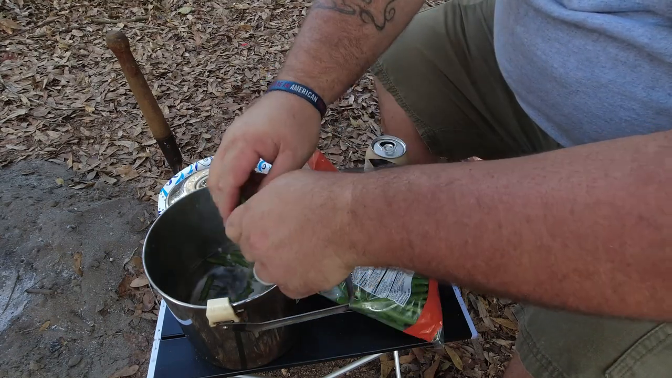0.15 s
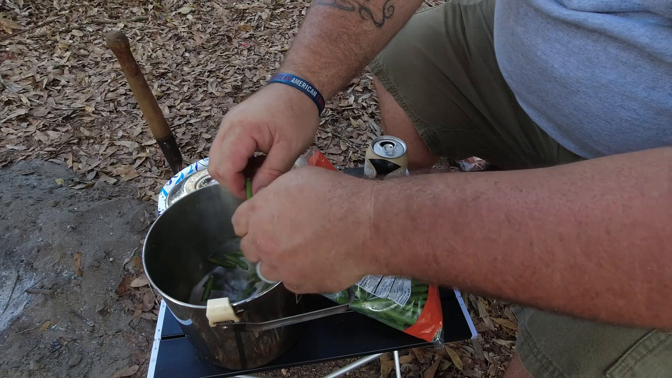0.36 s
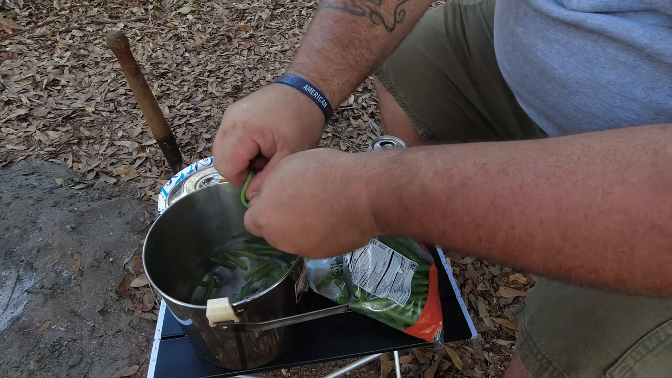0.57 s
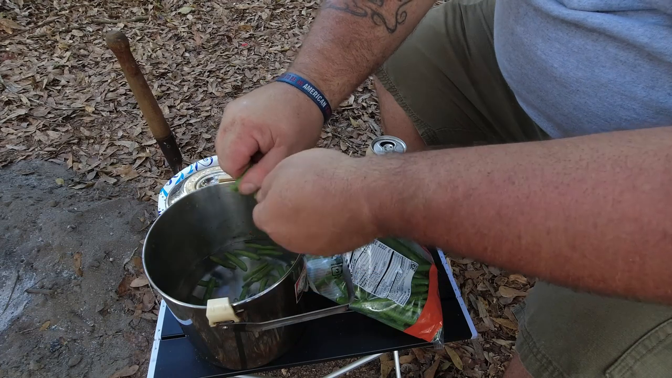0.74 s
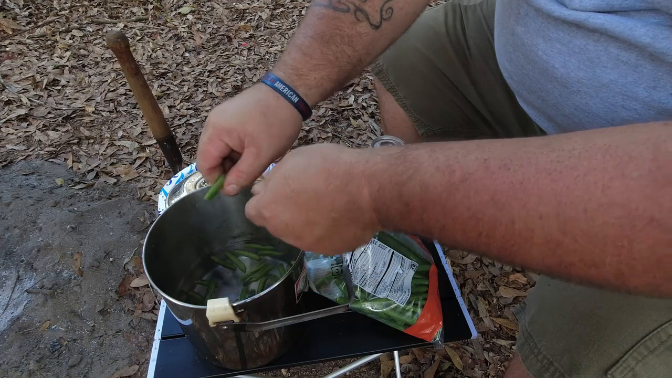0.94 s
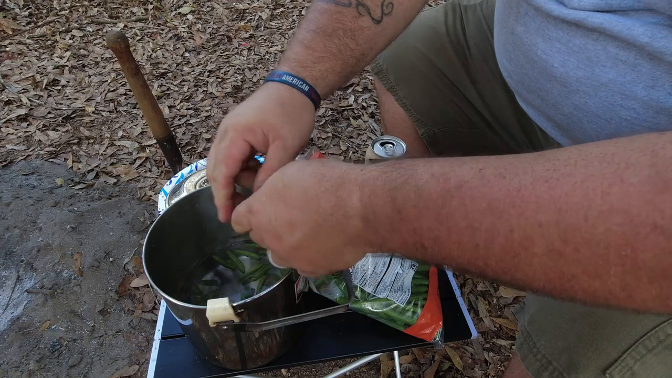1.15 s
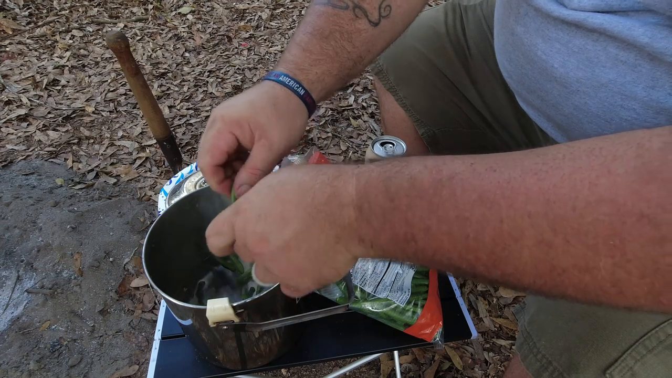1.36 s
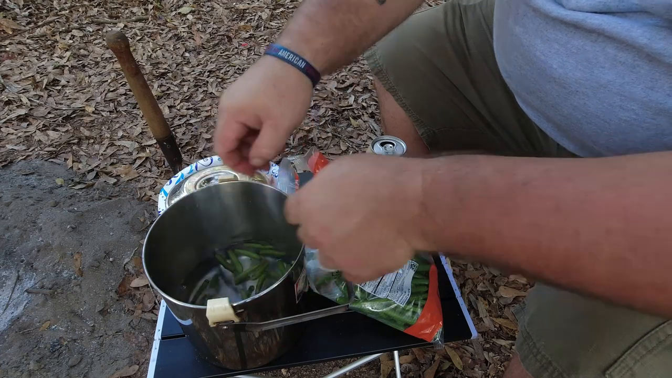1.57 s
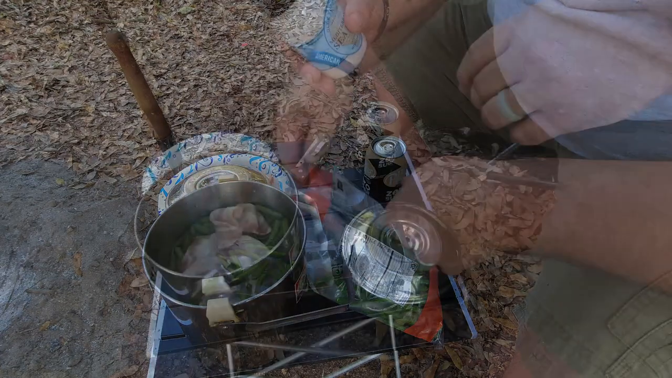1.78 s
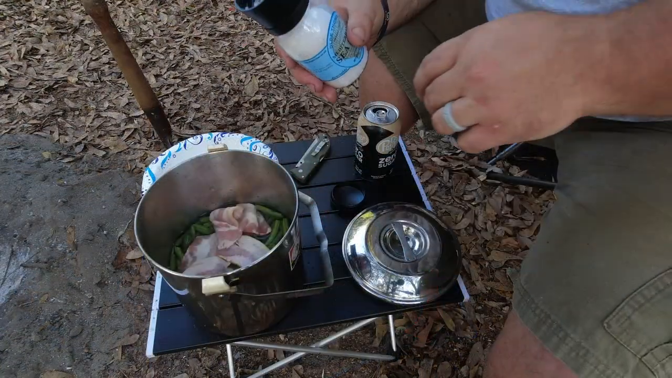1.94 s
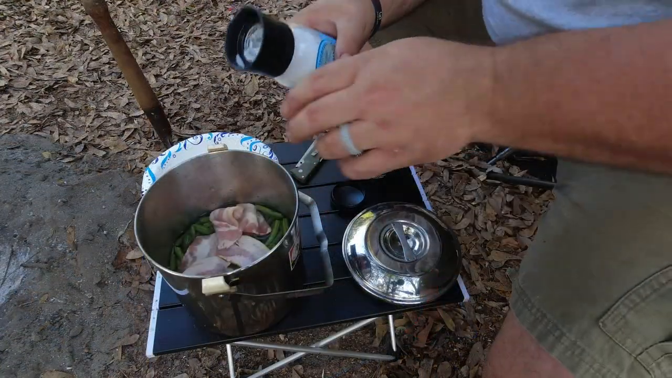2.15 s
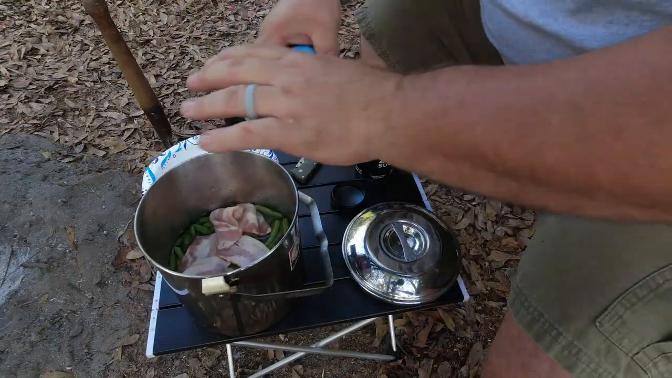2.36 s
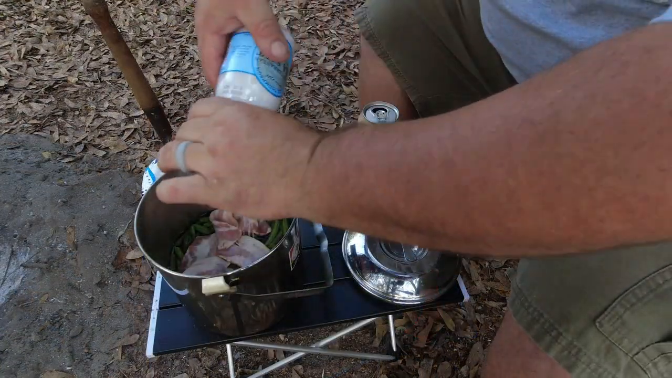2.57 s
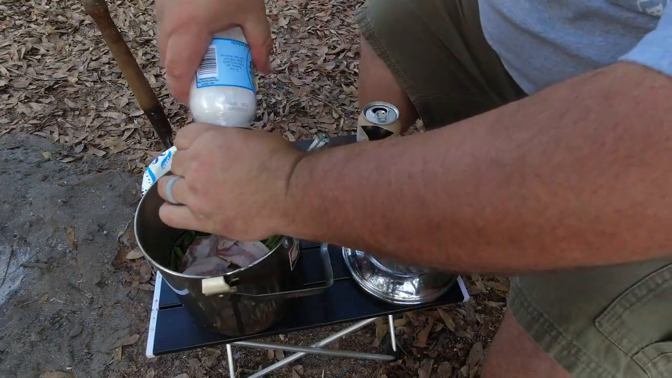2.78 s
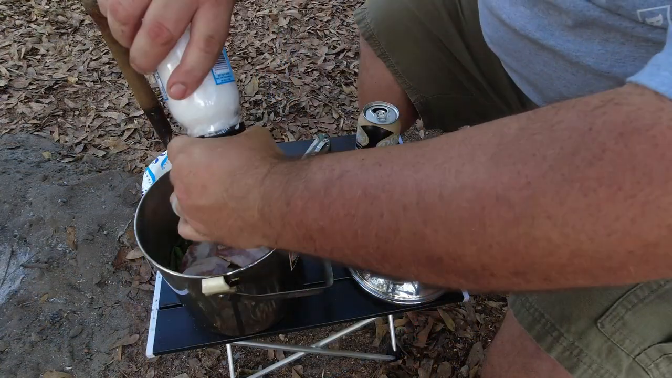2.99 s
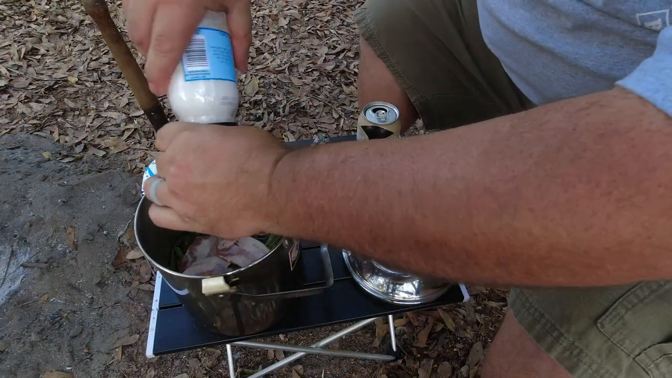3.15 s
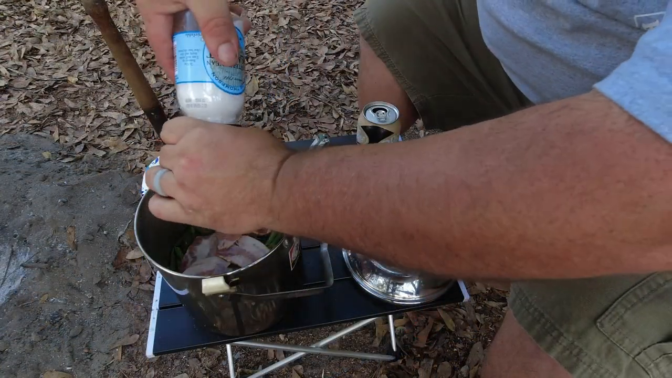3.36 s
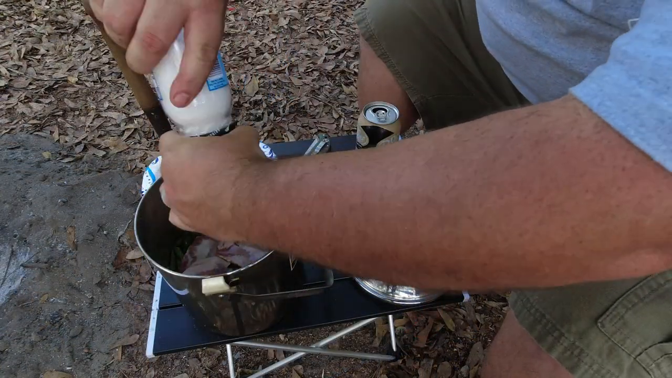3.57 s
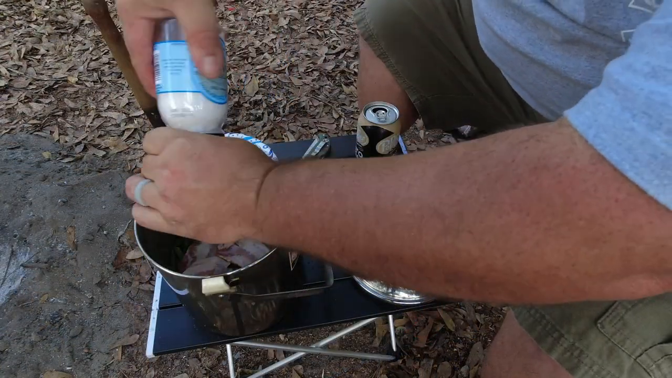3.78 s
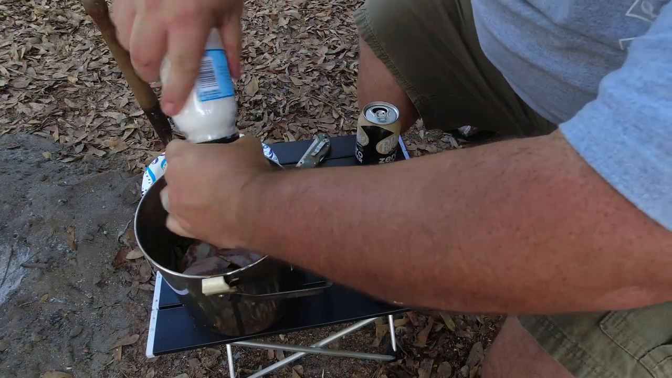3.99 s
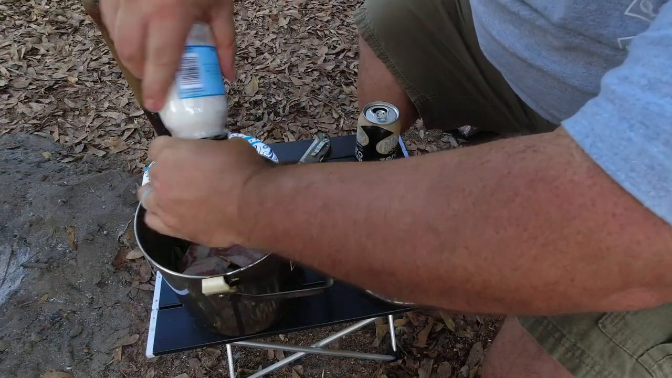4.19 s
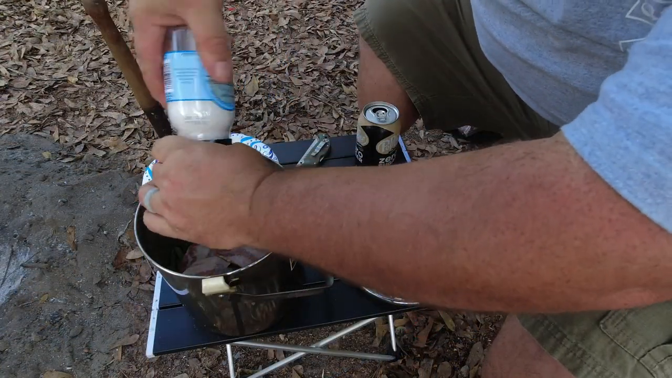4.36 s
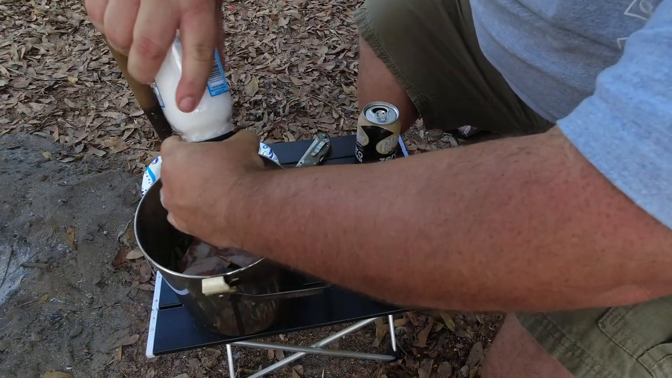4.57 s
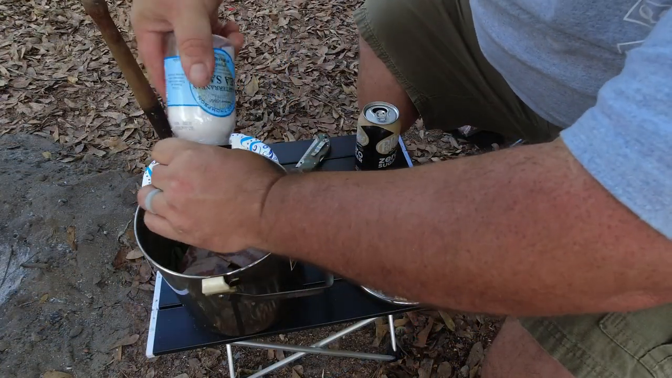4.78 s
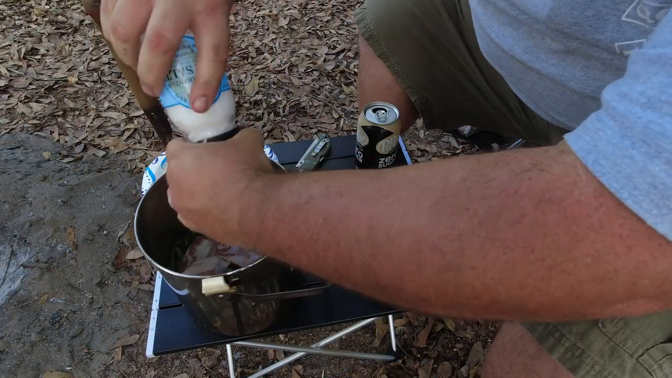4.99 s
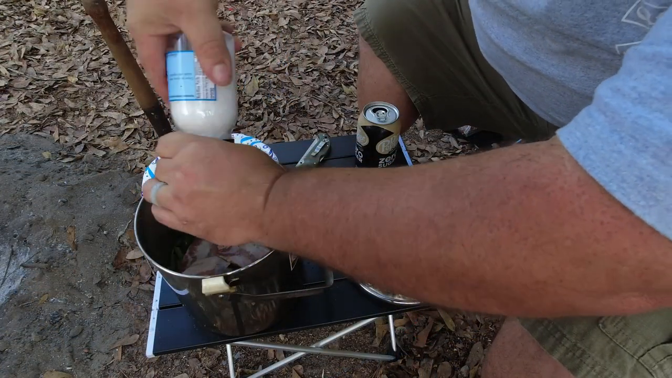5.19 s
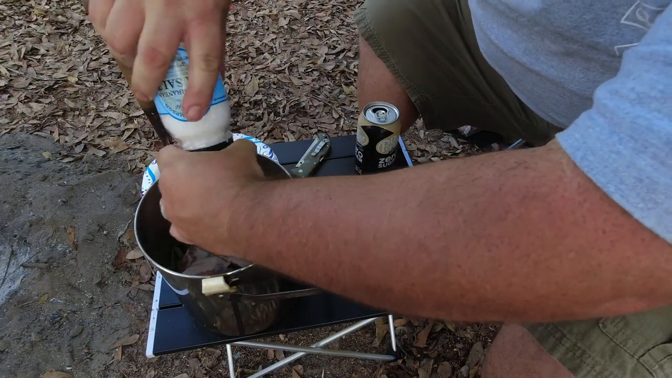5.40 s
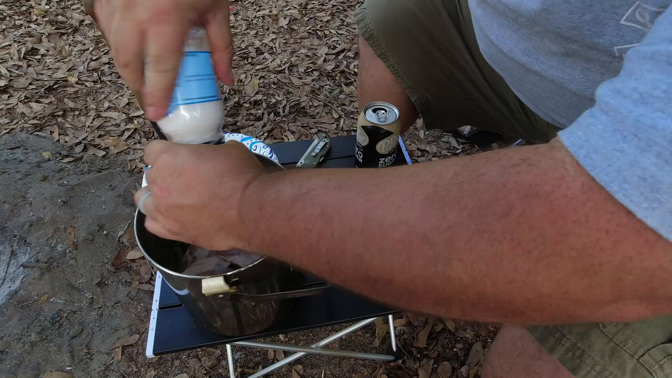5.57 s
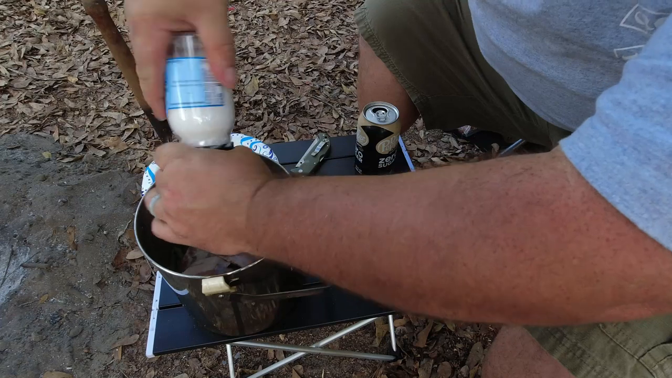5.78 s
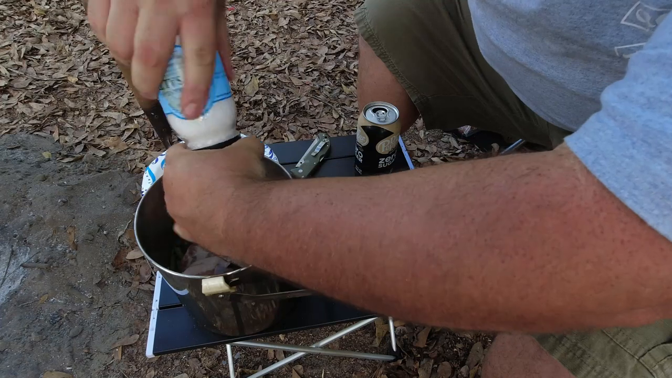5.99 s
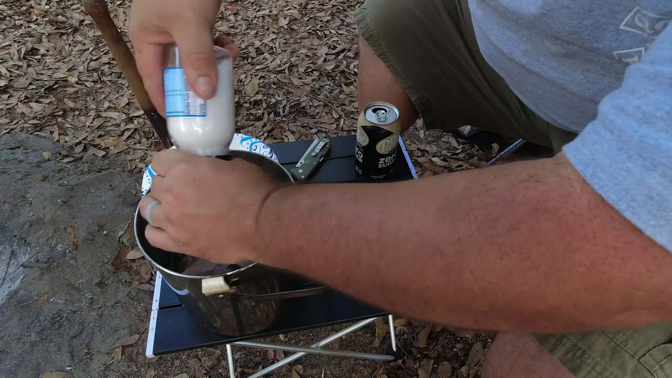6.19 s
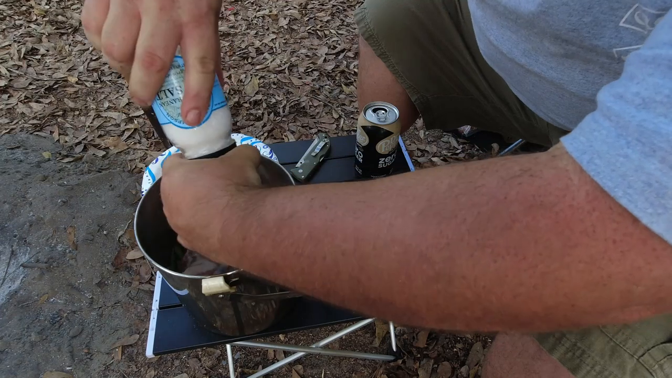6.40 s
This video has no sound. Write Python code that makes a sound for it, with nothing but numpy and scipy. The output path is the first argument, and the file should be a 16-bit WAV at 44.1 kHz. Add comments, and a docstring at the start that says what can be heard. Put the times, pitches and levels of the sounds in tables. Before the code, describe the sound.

Outdoors, close and dry, over a faint low rumble, bean pieces tap into a steel pot with short dull rings. A green bean snaps crisply, more bits drop, then a plastic bag crinkles briefly. Salt hisses down a tipped bottle, and a hand grinder crunches in hard, short twists alternating with lighter scraping turns until the end.

```python
"""Over a low rumble of air, bean pieces drop into a steel pot (noise thuds exciting decaying modes, one with a sharp
click), then a green bean is snapped (a click and a burst of small breaks). A plastic bag crinkles: dense breaks
with louder creases. Then salt slides down a tipped grinder's bottle (filtered grains) and the grinder is twisted
to and fro: hard forward turns crush the crystals, light back turns scrape and tick, and big crystals crack singly."""
import sys
import numpy as np
from scipy import signal
from scipy.fft import rfft, irfft
from scipy.io import wavfile
from scipy.ndimage import uniform_filter1d

SR = 44100
rng = np.random.default_rng(int(sys.argv[2]) if len(sys.argv) > 2 else 0)


def unload_audio(sound):
    """Save the sound as a 16-bit wav file, at the path given as the first command line argument."""
    columns = np.transpose(np.atleast_2d(sound))
    # keep every value between -1 and 1, then stretch to whole-number steps
    steps = np.round(np.clip(columns, -1, 1) * 32767)
    wavfile.write(sys.argv[1], SR, steps.astype(np.int16))


N = 284004
TIME = np.arange(N) / SR  # s

# Twists of the grinder. Each row: start in seconds, length in seconds, mid-turn level of the coarse grains in dB,
# the same for the fine grains in dB, seconds of light catching before the burrs bite.
FORWARD_TURNS = [(3.145, 0.19, -31.5, -38, .008), (3.75, 0.1, -30, -36.5, 0.024),
                 (4.224, 0.1, -30, -35.5, 0.03), (4.666, 0.1, -29.5, -37, 0.015),
                 (5.135, 0.13, -32, -37, 0.0087), (5.624, 0.082, -29.5, -33, 0.022),
                 (6.064, 0.12, -31, -38.5, .01)]
BACK_TURNS = [(2.775, 0.18, -43.5, -63, .004), (3.474, 0.12, -42.5, -57.5, 0.0087),
              (3.972, 0.12, -43, -49, 0.011), (4.418, 0.13, -45, -54, 0.011),
              (5.367, 0.092, -44, -47.5, .003), (5.825, 0.11, -47.5, -49, 0.029),
              (6.3, 0.095, -46, -47, 0.035)]
# Spectrum of the grinder's body. Each row: frequency in Hz, relative level in dB.
GRINDER_COLOUR = [(88, -107), (150, -32), (398, -10), (589, -16.5), (837, -17.5), (1120, -4.5),
                  (1240, -6.5), (1630, -3), (2450, -2.5), (3920, -4), (5150, -8), (6260, -10), (7320, -17),
                  (13200, -19), (16000, -41)]
# Resonances and dips of the grinder's head. Each row: centre in Hz, width in Hz, height in dB.
GRINDER_HEAD = [(240, 20, 3), (587, 45, 7), (730, 760, 1), (1112, 150, 4), (3940, 970, 2.5),
                (5116, 700, -8), (6470, 190, 6), (12470, 3360, -10)]
# Sag of the coarse grains' level at both ends of a twist, which is hardest in its middle.
COARSE_ARCH_DB = 4


def grinder():
    """Brittle fracture under shear: burrs crush the crystals while big ones crack singly."""
    # Big crystals cracking. Each row: time in seconds, peak in dB before the common cut below,
    # pitch in Hz, treble lift in dB.
    big_crystals = [(2.776, -14, 1740, -13), (2.85, -23, 2390, -17), (2.889, -14.5, 2730, -15),
                    (2.9, -10, 1640, -5), (2.914, -16, 1950, -21), (2.931, -13, 1440, -12),
                    (3.13, -16.5, 2670, 15), (3.14, -13.5, 2030, -8), (3.156, -14.5, 2400, -9),
                    (3.163, -14.5, 1920, -22), (3.171, -14.5, 2500, -13), (3.227, -13, 2970, 5),
                    (3.282, -20, 2530, -9), (3.31, -16.5, 3770, 2), (3.531, -15.5, 3470, 9),
                    (3.595, -15.5, 3950, 20), (3.723, -24, 2400, 15), (3.741, -9, 2460, -1),
                    (3.837, -13, 1730, -6), (3.974, -17.5, 3940, 19), (3.993, -14, 1390, -7.5),
                    (4.036, -16, 1550, -8), (4.265, -13, 1650, -6), (4.338, -25, 2600, -1),
                    (4.419, -21, 1590, -4), (4.429, -23, 3850, 18), (4.467, -12, 2650, 7),
                    (4.492, -12.5, 3530, -2), (4.537, -21.5, 1900, 25), (4.555, -22.5, 2580, 17),
                    (4.659, -17, 2480, -10), (4.692, -13.5, 2200, -5), (4.714, -11.5, 2200, -5),
                    (4.752, -23, 2290, 0), (4.771, -15, 2040, 2), (4.885, -37, 2404, -12),
                    (5.136, -12.5, 2370, 5), (5.257, -15, 1390, -9), (5.276, -23, 1599, -15),
                    (5.367, -21.5, 4200, 19), (5.393, -22, 4330, 8), (5.468, -23, 2550, 3),
                    (5.609, -20, 1500, -17), (5.627, -14, 1085, -5), (5.831, -18, 3850, 6),
                    (5.9, -15, 2830, 2), (6.175, -17, 1623, -14), (6.27, -27.5, 3600, 27),
                    (6.326, -17, 2550, -10), (6.366, -15.5, 3000, 6.5), (6.371, -20, 2700, 2)]
    forward = crushing(FORWARD_TURNS, per_s=2600, spread_db=5.5, catch_db=-14.5)
    forward += small_cracks(FORWARD_TURNS, over_db=8)
    back = crushing(BACK_TURNS, per_s=5000, spread_db=5.5, catch_db=-8.5)
    back += small_cracks(BACK_TURNS, over_db=15)
    cracks = sum(crack(*row) for row in big_crystals)
    return scattered(forward + back + from_db(-2.5) * cracks, t60=0.021, wet_db=-13)


def crushing(turns, per_s, spread_db, catch_db):
    """Granular friction in two bands: coarse grains crunch low, fine ones fizz high, after a light catch."""
    split_hz, fine_arch_db = 3000, 4.5
    breaks = crackle(GRINDER_COLOUR, GRINDER_HEAD, per_s, spread_db, lift_db=12.5)
    low_pass = signal.butter(3, split_hz, "low", fs=SR, output="sos")
    high_pass = signal.butter(3, split_hz, "high", fs=SR, output="sos")
    coarse = rms_one(signal.sosfilt(low_pass, breaks))
    fine = rms_one(signal.sosfilt(high_pass, breaks))
    crunch = coarse * uneven() * twisting(turns, COARSE_ARCH_DB, axis=2)
    fizz = fine * uneven() * twisting(turns, fine_arch_db, axis=3)
    # the catch is set relative to the coarse level of its turn
    catch = sum(from_db(db + catch_db) * stroke(s - lead, lead, 0, 3300, 2300) for s, _, db, _, lead in turns)
    return crunch + fizz + breaks * catch


def small_cracks(turns, over_db, pitch_hz=2300, treble_db=-6):
    """Random fracture: lesser crystals break at uneven intervals, each with its own size and hardness."""
    cracks_per_s, spread_db = 30, 2.5
    out = np.zeros(N)
    for start, length, coarse_db, *_ in turns:
        places = rng.random(16)
        chances = rng.standard_normal((16, 3)).clip(-1.5, 1.5)
        for k, (place, (loud, high, hard)) in enumerate(zip(places, chances)):
            delay = (k + place) / cracks_per_s  # one crack per equal slot, anywhere within it
            if delay < length:
                peak_db = coarse_db + over_db + spread_db * loud
                out += crack(start + delay, peak_db, pitch_hz * 2 ** (.5 * high), treble_db + 5 * hard)
    return out


def crack(s, db, hz, treble_db):
    """Impulsive excitation of a resonant body: crystal size sets the pitch, hardness the treble."""
    hardness = (12100, 18000, treble_db)  # centre Hz, width Hz, lift dB
    response = tinted(GRINDER_COLOUR, [*GRINDER_HEAD, hardness], hz, lift_db=7)
    return fracture(s, db, response, run_s=.0009, click_db=-0.5)


def twisting(turns, arch_db, axis):
    """Amplitude modulation by a series of twists, scaled by one of their level columns."""
    rise_db_per_s, fall_db_per_s = 1400, 730
    return sum(from_db(row[axis]) * stroke(row[0], row[1], arch_db, rise_db_per_s, fall_db_per_s) for row in turns)


def uneven():
    """Random amplitude modulation: the salt feeds the burrs unevenly."""
    depth_db, centre_hz = 1.68, 34.4
    wander = rms_one(band(rng.standard_normal(N), centre_hz / 2, centre_hz * 2))
    return from_db(depth_db * np.clip(wander, -2, 2))


def loose_salt(settle_s=0.037):
    """Granular flow: salt hisses down the tipped bottle, and trickles on for a moment after each turn."""
    # Slides down the bottle. Each row: start in seconds, length in seconds, mid-slide level in dB.
    slides = [(2.488, 0.48, -48), (4.89, 0.096, -59.5), (5.035, 0.068, -51.5)]
    # Spectrum of the sliding salt. Each row: frequency in Hz, relative level in dB.
    slide_colour = [(710, -36), (1200, -14.5), (1810, -12), (2090, -14), (2300, -11.5), (3470, 0.5),
                    (5300, -9), (6030, -6), (8630, -6), (13900, -19.5), (16000, -32.5)]
    stirred = from_db(-21.5) * twisting(FORWARD_TURNS, COARSE_ARCH_DB, axis=2)
    stirred += from_db(-7) * twisting(BACK_TURNS, COARSE_ARCH_DB, axis=2)
    keep = np.exp(-1 / (settle_s * SR))
    trickle = signal.lfilter([1 - keep], [1, -keep], stirred)  # one-pole lag
    sliding = sum(from_db(db) * stroke(s, length, arch_db=7.5, rise_db_per_s=220, fall_db_per_s=126)
                  for s, length, db in slides)
    hiss = rms_one(through(grains(per_s=9000, spread_db=7), body(slide_colour)))
    return (sliding + trickle) * hiss


def bean_clicks():
    """Impulsive contact, then brittle fracture: a bean strikes the pot and another snaps; the pot answers faintly."""
    # Sharp clicks: a bean striking the pot at 0.16 s, then a bean snapping at 0.7528 s.
    # Each row: time in seconds, peak in dB, starting level of the pot's answer in dB.
    clicks = [(0.16, -35, -70), (0.7528, -14, -54.5)]
    # Spectrum of both clicks. Each row: frequency in Hz, relative level in dB.
    click_colour = [(300, -26), (1000, -14), (1500, -12), (2150, 0), (3400, -3), (4550, -2), (5000, -11),
                    (6300, -6), (8300, -8), (11000, -5), (16000, -20)]
    out = np.zeros(N)
    for s, db, ring_db in clicks:
        out += fracture(s, db, body(click_colour), run_s=.0009, click_db=-1)
        answer = from_db(ring_db - 60 * TIME / 0.19) * np.sin(2 * np.pi * 2196 * TIME)  # t60 0.19 s
        add(out, s, answer)
    return scattered(out, t60=.09, wet_db=-24)


def bean_drops(thud_t60=0.022, thump_t60=0.1, ring_db=-11, size=13000):
    """Modal excitation: a short thud over a low thump; pot modes nearest the contact's pitch ring most."""
    # Landings in the pot. Each row: time in seconds, peak of the thud in dB, centre of the contact's sound in Hz.
    drops = [(0.104, -47, 348), (0.1166, -50, 2840), (0.156, -30.5, 1670), (0.160, -25, 3600),
             (0.165, -32.5, 6260), (0.836, -49.5, 2960), (1.169, -47.5, 450), (1.169, -55, 3360),
             (1.193, -46.5, 1170), (1.223, -44.5, 1280), (1.237, -56, 2500), (1.616, -42.5, 467),
             (1.624, -44.5, 280), (1.656, -30.5, 1270)]
    # Modes of the loaded pot. Each row: frequency in Hz, relative level in dB, t60 in seconds.
    pot_modes = [(240, -6, .11), (297, -6, .11), (450, -4, .13), (555, -6, .11), (1210, 2, .14),
                 (1701, -10, .13), (2196, -10, .14), (2686, -3, .08), (3693, -4, .13), (5523, -17, .09),
                 (6395, -7, .11), (6831, -12, .15)]
    thump_hz, thump_db = 340, -21.5  # the pot's floor, relative to the thud
    out, t = np.zeros(N), np.arange(size) / SR
    for s, db, hz in drops:
        contact = rng.standard_normal(size) * from_db(-60 * t / thud_t60)
        thud = band(contact, hz / 1.2, hz * 1.2) + from_db(-13) * band(contact, hz / 3, hz * 1.8)
        floor_push = rng.standard_normal(size) * from_db(-60 * t / thump_t60)
        thump = band(floor_push, thump_hz / 1.4, thump_hz * 1.26)
        ring = np.zeros(size)
        for mode_hz, mode_db, t60 in pot_modes:
            nearness = 1 / (1 + 2 * np.log2(mode_hz / hz) ** 2)
            ring += nearness * from_db(mode_db - 60 * t / t60) * np.sin(2 * np.pi * mode_hz * t)
        landing = thud / np.abs(thud).max()
        landing += from_db(thump_db) * thump / np.abs(thump).max()
        landing += from_db(ring_db) * ring
        add(out, s, from_db(db) * landing)
    return scattered(out, t60=0.075, wet_db=-13.5)


def bag():
    """Buckling film: fine crinkling swells as the hand closes, and louder creases pop."""
    # Grabs of the bag. Each row: start in seconds, length in seconds, level in dB reached at the end.
    grabs = [(1.778, .11, -36.5), (1.921, 0.052, -42)]
    # Creases popping. Each row: time in seconds, peak in dB.
    creases = [(1.754, -31), (1.775, -23.5), (1.785, -29), (1.813, -29.5), (1.874, -19.5), (1.881, -18.5),
               (1.925, -23.5), (1.936, -28), (1.9533, -16.5), (1.961, -22), (1.975, -28.5)]
    # Spectrum of the plastic. Each row: frequency in Hz, relative level in dB.
    bag_colour = [(110, -38), (180, -8), (225, -2), (404, -8.5), (515, -0.5), (645, -12.5), (839, -2),
                  (1620, -4), (1990, 3.5), (2400, -5), (3300, 1.5), (5090, -13), (9460, -22), (16000, -48)]
    swell_db_per_s = 99
    grip = np.zeros(N)
    for s, length, db in grabs:
        time_left = np.clip(s + length - TIME, 0, length)
        grab = stroke(s, length, arch_db=0, rise_db_per_s=398, fall_db_per_s=1500)
        grip += from_db(db - swell_db_per_s * time_left) * grab
    rustle = crackle(bag_colour, [], per_s=5000, spread_db=11.5, lift_db=5.5) * grip
    crease = tinted(bag_colour, [], hz=11200, lift_db=4.5)
    return rustle + sum(fracture(s, db, crease, run_s=0.0016, click_db=-6.5) for s, db in creases)


def air():
    """Filtered noise: a faint outdoor hush and hum, soft buffeting and, at first, a deep drone."""
    # Spectrum of the hush. Each row: frequency in Hz, relative level in dB.
    air_colour = [(35, -44), (60, -1.5), (79, -12), (124, -28), (301, -22.5), (607, -27), (785, -26),
                  (1200, -29.5), (5460, -39.5), (6580, -37), (12400, -58), (16000, -104)]
    # Faint far-off hum. Each row: time in seconds, level in dB.
    hum_levels = [(0, -62.5), (1.35, -69.5), (1.9, -59), (3.2, -64.5), (4.3, -68.5), (5.1, -75.5),
                  (6.44, -72)]
    # Slow breeze. Each row: time in seconds, level in dB.
    breeze = [(0, -50), (1.9, -60.5), (2.1, -77), (3.0, -68), (3.5, -51.5), (4.8, -53.5), (5.9, -45),
              (6.44, -51)]
    # Gusts on the microphone, added to the breeze. Each row: time of the peak in seconds, peak level in dB.
    gusts = [(0.03, -36.5), (1.05, -36.5), (1.87, -42)]
    gust_db_per_s = 79  # swelling and dying alike
    drone_hz, drone_db, drone_end_s = 37.8, -50.5, 1.8
    hush = from_db(-62.5) * rms_one(through(rng.standard_normal(N), body(air_colour)))
    hum = gain_curve(hum_levels) * rms_one(band(rng.standard_normal(N), 63.0, 147.5))
    wind = gain_curve(breeze) + sum(from_db(db - gust_db_per_s * np.abs(TIME - s)) for s, db in gusts)
    buffet = wind * rms_one(band(band(rng.standard_normal(N), 10, 22), 10, 30))
    narrow_noise = band(rng.standard_normal(N), drone_hz - 3, drone_hz + 3)
    drone = evened(narrow_noise, span_s=.12) * gain_curve([(0, drone_db), (drone_end_s, drone_db)])
    return hush + hum + buffet + drone


def fracture(s, db, response, run_s, click_db, size=2048):
    """Impulsive excitation: a click among smaller breaks that swell and die within milliseconds."""
    age, chance = np.arange(size) / SR / run_s, rng.standard_normal(size)  # age in units of run_s
    force = chance * np.abs(chance) * age * np.exp(-age)
    force /= np.linalg.norm(force)
    force[int(run_s * SR / 2)] += from_db(click_db)
    out, sound = np.zeros(N), through(force, response)
    add(out, s, from_db(db) * sound / np.abs(sound).max())
    return out


def crackle(colour, resonances, per_s, spread_db, lift_db, count=7):
    """Superposed shot noise: dense breaks of several sizes, each with its pitch, through a body; rms near 1."""
    breaks = np.zeros(N)
    for hz in np.geomspace(900, 11000, count):
        pitched = tinted([(1, 0)], [], hz, lift_db)  # flat apart from the lift
        breaks += through(grains(per_s / count, spread_db), pitched) * np.sqrt(hz)
    return evened(through(breaks, body(colour, resonances)), span_s=0.019)


def grains(per_s, spread_db):
    """Shot noise: random clicks of uneven size and either sign."""
    sizes = from_db(spread_db * np.clip(rng.standard_normal(N), -2, 2)) * rng.choice([-1, 1], N)
    return sizes * (rng.random(N) < per_s / SR)


def stroke(start, length, arch_db, rise_db_per_s, fall_db_per_s):
    """Exponential onset and decay of one hand movement, with a parabolic arch in dB between them."""
    along = np.clip((TIME - start) / length, 0, 1)
    before, after = np.maximum(start - TIME, 0), np.maximum(TIME - start - length, 0)
    outside = rise_db_per_s * before + fall_db_per_s * after
    return from_db(-np.minimum(arch_db * (2 * along - 1) ** 2 + outside, 200))


def tinted(colour, resonances, hz, lift_db):
    """Size-dependent resonance: a body's response favouring one pitch, higher for small pieces."""
    return body(colour, [*resonances, (hz, 0.59 * hz, lift_db)])


def body(colour, resonances=(), size=4096):
    """Minimum-phase filtering: the causal impulse response with this spectrum, at energy 1."""
    hz = np.fft.rfftfreq(size, 1 / SR) + 1  # offset keeps the logarithm finite
    points_hz, points_db = np.transpose(colour)
    db = np.interp(np.log(hz), np.log(points_hz), points_db)
    for centre, width, height in resonances:
        db = db + height / (1 + (2 * (hz - centre) / width) ** 4)
    cepstrum = irfft(np.log(from_db(db)))
    # folding the cepstrum onto positive time gives minimum phase
    cepstrum[1:size // 2] *= 2
    cepstrum[size // 2 + 1:] = 0
    response = irfft(np.exp(rfft(cepstrum)))
    return response / np.linalg.norm(response)


def scattered(x, t60, wet_db, size=8192):
    """Diffuse reflection between pot, table and hands: a short dense tail of decaying noise."""
    t = np.arange(size) / SR
    tail = band(rng.standard_normal(size), 165, 12600) * from_db(-60 * t / t60) * (t > .002)
    return x + from_db(wet_db) * through(x, tail / np.linalg.norm(tail))


def through(x, response):
    """Linear convolution with an impulse response."""
    return signal.fftconvolve(x, response)[:len(x)]


def band(x, low_hz, high_hz):
    """Band-pass filtering, kept within 10 Hz and 0.45 of the sample rate."""
    edges = [max(low_hz, 10), min(high_hz, .45 * SR)]
    return signal.sosfilt(signal.butter(2, edges, "band", fs=SR, output="sos"), x)


def evened(x, span_s):
    """Level compression: rms held near 1 over a span, the finer grain kept."""
    power = np.maximum(uniform_filter1d(x ** 2, max(2, int(span_s * SR))), 0)
    return x / np.sqrt(power + 1e-3 * np.mean(x ** 2))


def gain_curve(rows):
    """Logarithmic envelope through (s, dB) points, silent outside them, with edges softened over 3 ms."""
    db = np.interp(TIME, *np.transpose(rows), left=-200, right=-200)
    return uniform_filter1d(from_db(db), size=130)


def from_db(db):
    """Amplitude ratio of a level in dB."""
    return 10 ** (np.asarray(db) / 20)


def rms_one(x):
    """Power normalisation to an rms of 1."""
    return x / np.sqrt(np.mean(x ** 2) + 1e-20)


def add(out, s, sound):
    """Superposition: mix a sound in at a time in seconds."""
    i = max(0, int(s * SR))
    out[i:i + len(sound)] += sound[:N - i]


def scene():
    """Superposition of all the sources in one channel."""
    return (bean_clicks() + bean_drops() + bag() + grinder() + loose_salt() + air())[None]


def record(dry):
    """Low-pass filtering: an elliptic filter cuts steeply above 16 kHz."""
    return signal.sosfilt(signal.ellip(10, .1, 80, 16000, fs=SR, output="sos"), dry)


dry = scene()
out = record(dry)
unload_audio(out)
```